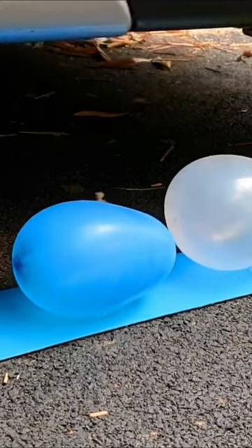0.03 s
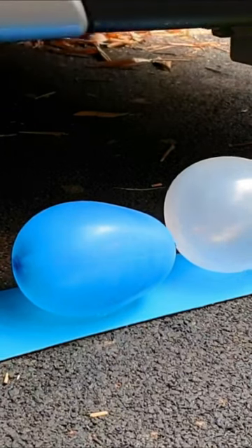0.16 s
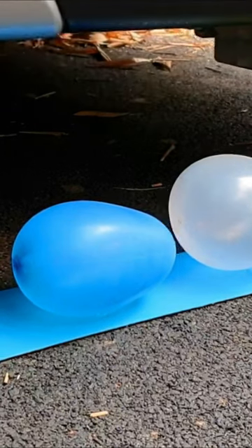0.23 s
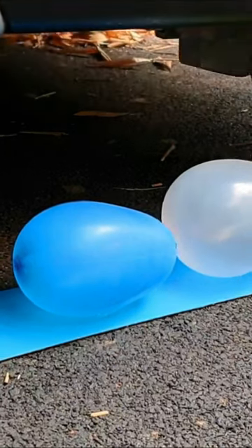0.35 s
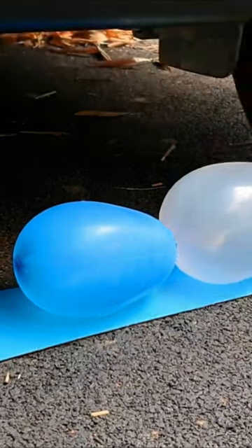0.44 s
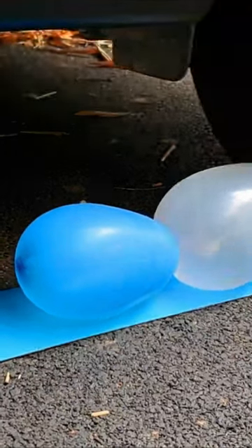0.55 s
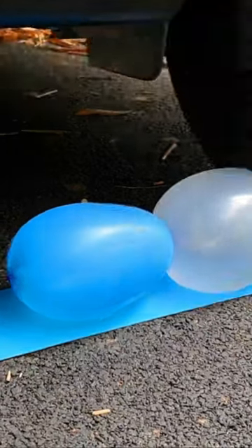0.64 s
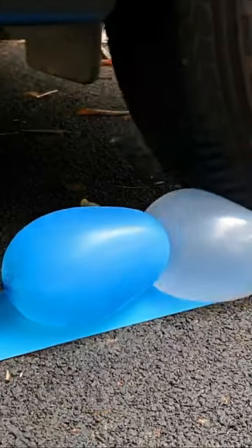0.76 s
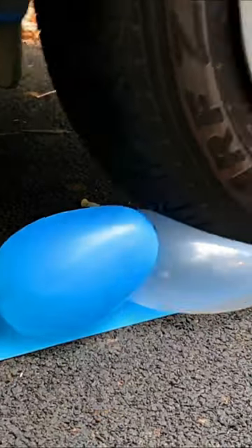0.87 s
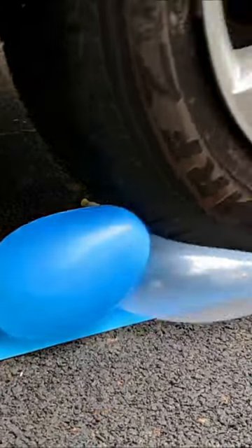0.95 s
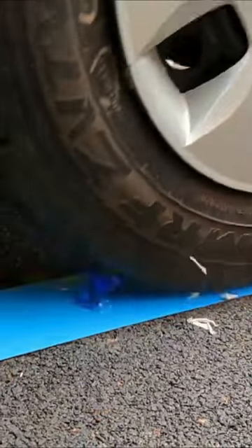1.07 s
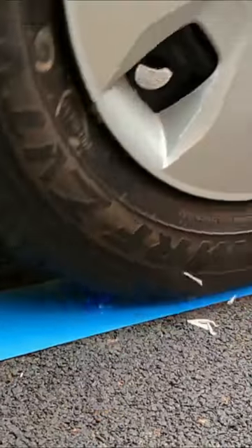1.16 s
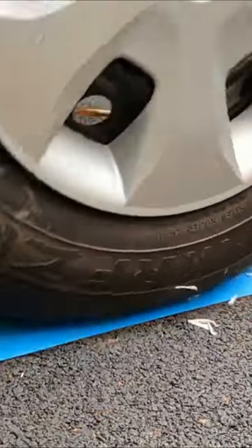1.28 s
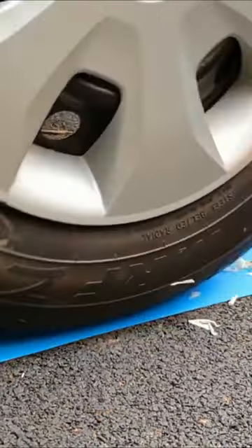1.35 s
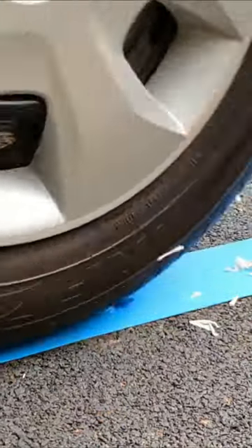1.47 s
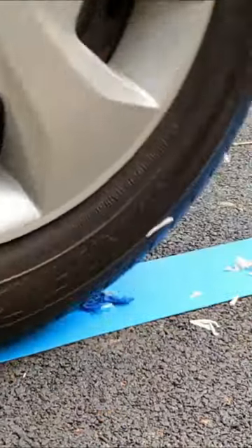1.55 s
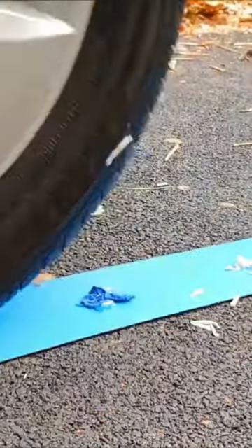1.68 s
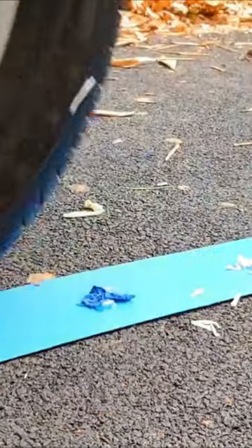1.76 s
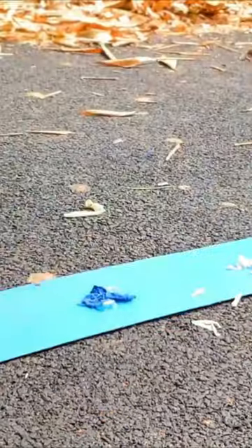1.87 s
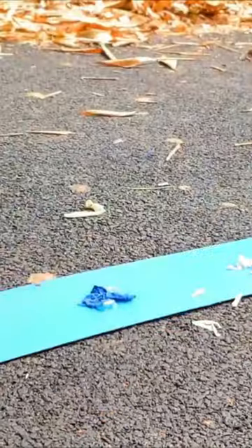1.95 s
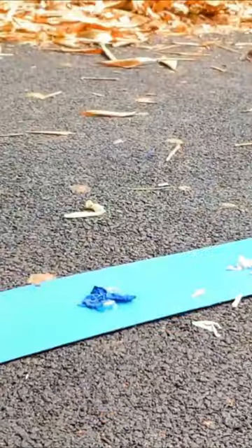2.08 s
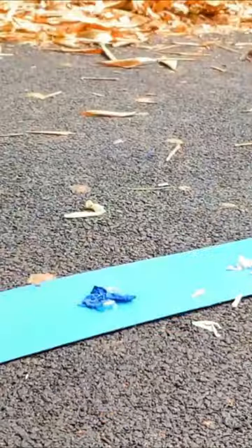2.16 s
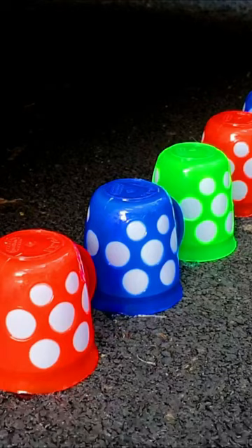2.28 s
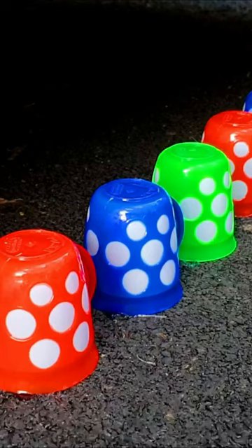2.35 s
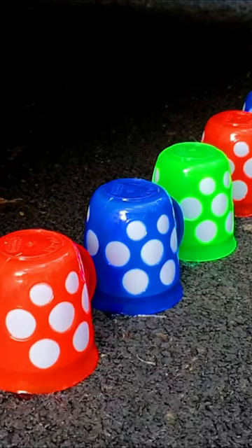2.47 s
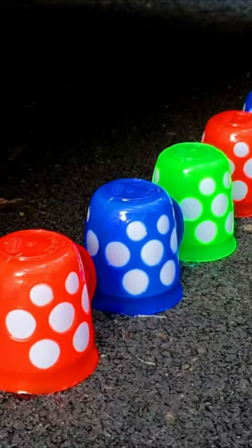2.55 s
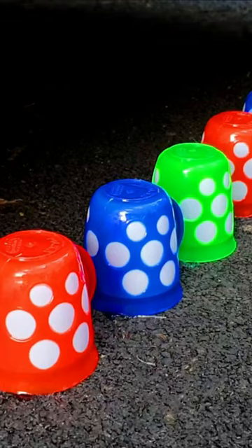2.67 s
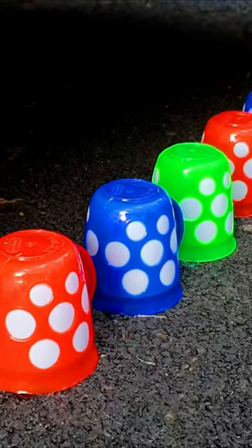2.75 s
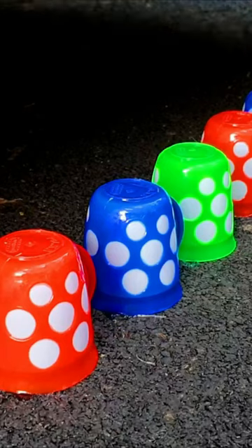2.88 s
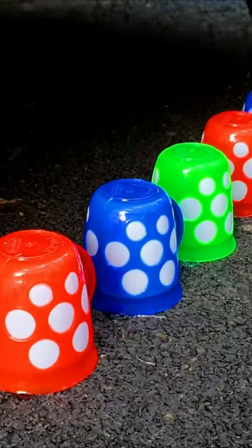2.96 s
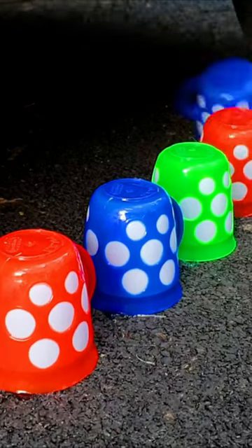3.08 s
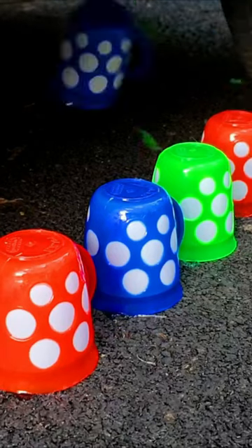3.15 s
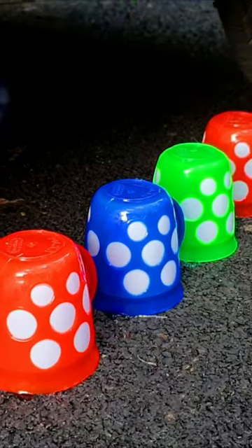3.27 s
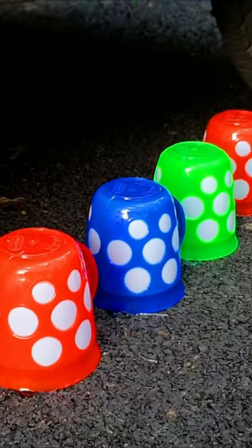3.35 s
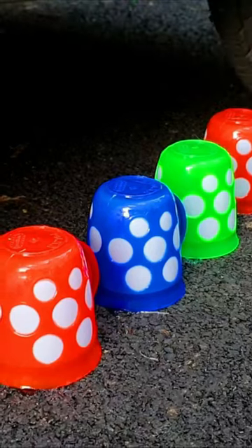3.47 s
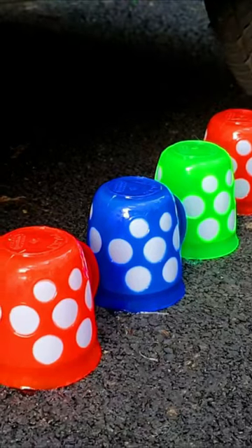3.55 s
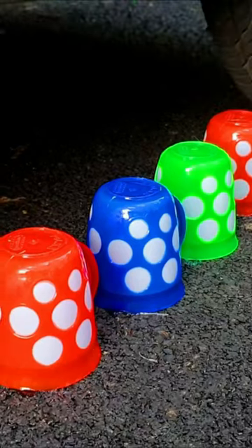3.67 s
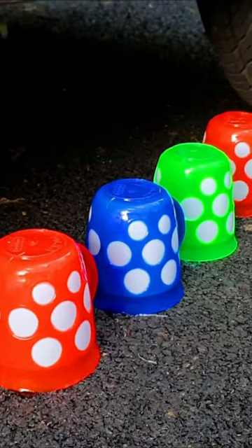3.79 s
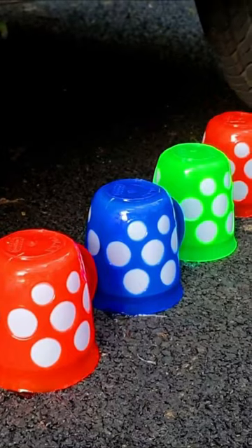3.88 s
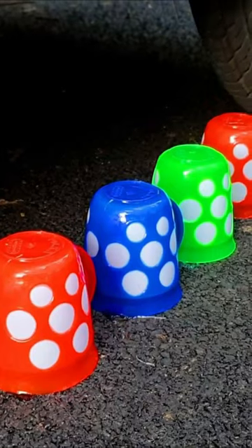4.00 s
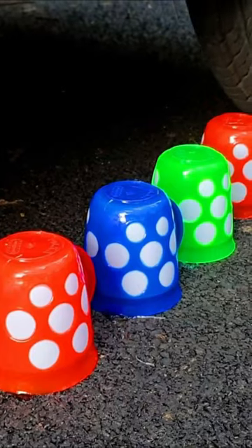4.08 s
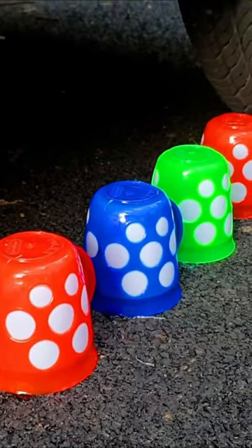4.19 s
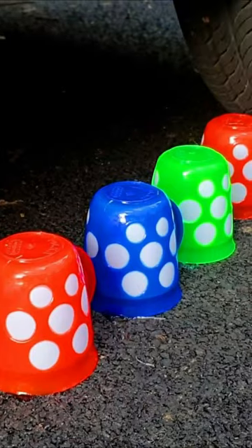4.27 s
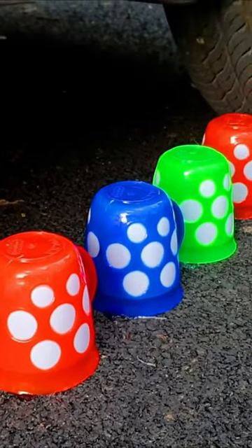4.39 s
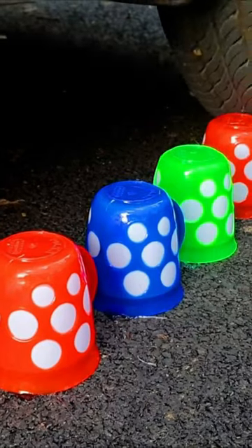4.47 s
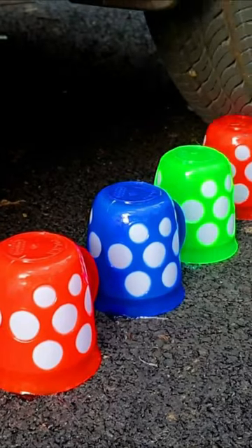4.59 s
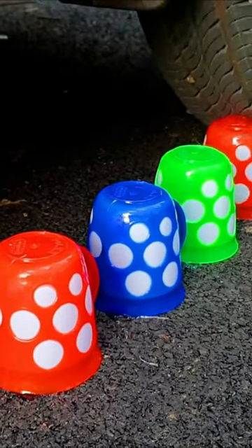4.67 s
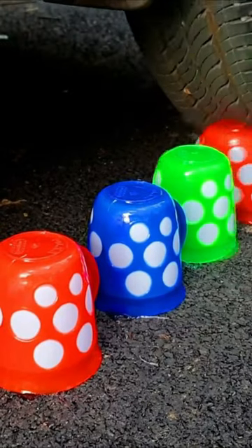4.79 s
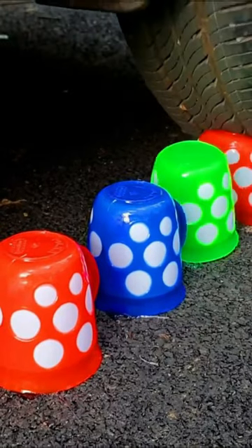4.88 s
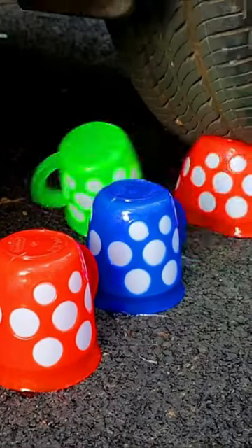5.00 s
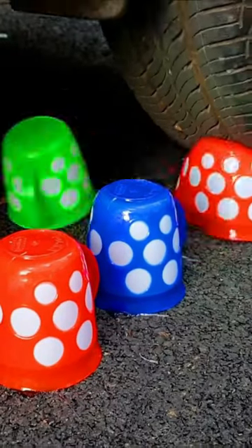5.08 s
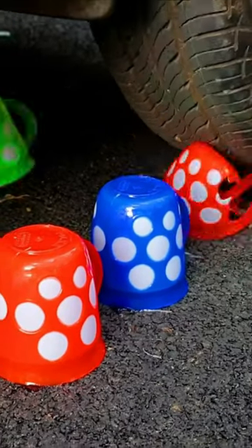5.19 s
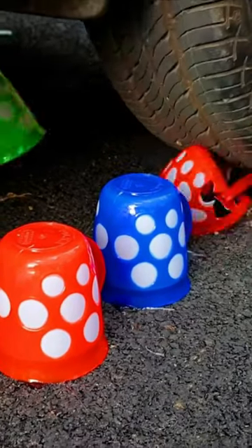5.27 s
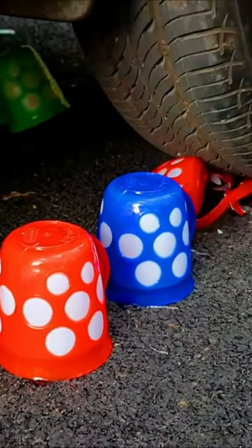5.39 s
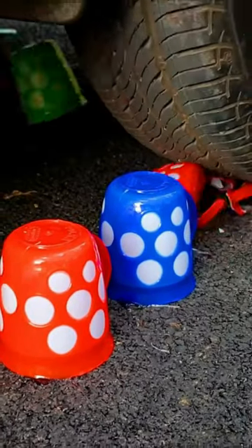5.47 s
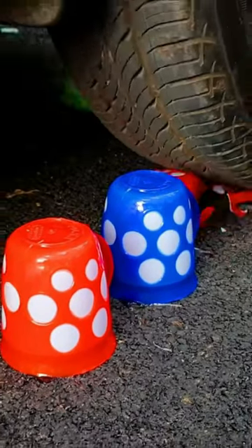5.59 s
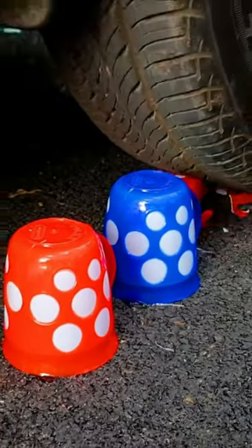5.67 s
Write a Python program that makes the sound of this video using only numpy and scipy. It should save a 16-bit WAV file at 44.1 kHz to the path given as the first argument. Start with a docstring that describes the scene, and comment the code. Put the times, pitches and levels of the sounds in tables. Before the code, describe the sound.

Close to a car tyre on asphalt, the engine is at first barely audible, with a dry tick or two at 0.2-0.3 s and a light rubbery tap near 0.6. A balloon bursts at 0.7 s with a huge blunt bang and a puff of low air; another pops at 1.1 in a tight double crack, a third at 1.6. Each leaves a short, diffuse answer from beneath the car. It goes almost quiet, wholly silent around 2.4, then low engine hum and hiss jump in, with a faint whine falling until 2.85. At 3.15-3.3 hard plastic cracks and crunches; hollow knocks, clacks and gritty ticks scatter until about 4.1 while the engine sinks. It swells again, rising in pitch. At 4.85 a heavier crush begins: dense splintering cracks until 5.3, then sparser snaps, a last sharp one at 5.64. Peaks sound flattened, with a dull copy slightly ahead.

```python
"""A car hums and hisses close by, with a few dry ticks: an engine idles and the car creeps over asphalt.
Its tyre bursts three balloons; after a short silence of the car it crushes hard plastic cups that bounce away.
The car is wavering tones plus shaped noise; blows are bursts of small breaks sent through resonances.
The underbody answers each blow with fading noise, slow thumps swing and crumble, and loud peaks flatten.
Everything sounds doubled: a fainter, duller copy runs just ahead."""
import sys
import numpy as np
from scipy import signal
from scipy.fft import rfft, irfft, next_fast_len
from scipy.io import wavfile
from scipy.ndimage import map_coordinates

SR = 44100
rng = np.random.default_rng(int(sys.argv[2]) if len(sys.argv) > 2 else 0)


def log_audio(samples):
    """Write samples as a 16-bit WAV file to the path given in sys.argv[1]."""
    # one column per channel
    frames = np.atleast_2d(samples).T
    # limit to full scale, then quantise
    limited = np.clip(frames, -1, 1)
    pcm = np.round(limited * 32767).astype(np.int16)
    wavfile.write(sys.argv[1], SR, pcm)


def volts_from_decibels(level):
    """Turn decibel levels (scalar or array-like) into linear amplitude factors."""
    exponent = np.asarray(level, float) / 20
    return 10 ** exponent


N = 253134  # length in samples

# Running car [t/s, rumble level/dB, hiss level/dB]
CAR_LEVELS = [(0, -59.5, -63.5), (.2, -58.5, -66.5), (.36, -59.5, -61.5), (.65, -59, -66), (.92, -68, -76),
              (1.85, -76, -84), (2.37, -73.5, -89), (2.42, -41.5, -52.5), (2.52, -41, -50.5),
              (2.72, -41, -59.5), (2.78, -47.5, -59.5), (3.4, -51.5, -59), (3.8, -65.5, -74.5),
              (4.1, -54.5, -72.5), (4.5, -49, -68.5), (4.75, -48, -68.5), (5.74, -54, -53)]
# How often the engine fires [t/s, firing rate f/Hz]
FIRING_RATE = [(0, 36.5), (.65, 34.5), (.9, 25), (1.8, 22.5), (2.38, 22.5), (2.41, 38.5), (2.72, 28),
               (2.8, 26), (3.95, 23), (4.2, 30.5), (4.5, 39), (4.75, 43.5), (5.74, 46)]
# Tone colour of the exhaust [f/Hz, relative level/dB]
EXHAUST_COLOUR = [(25, -25.5), (68, -3.5), (117, -6), (209, -12.5), (285, -15.5), (368, -27.5),
                  (519, -35.5), (1500, -46.5), (3300, -120)]
# Tone colour of fan and tyre [f/Hz, relative level/dB]
HISS_COLOUR = [(200, -52.5), (400, -8), (1900, -18), (3210, -23), (5270, -16.5), (7400, -32), (10100, -24),
               (16000, -51)]
# Belt whine [t/s, f/Hz, level/dB]
BELT_WHINE = [(2.502, 1942, -63), (2.657, 1600, -63.5), (2.8, 1457, -60.5)]
ROUGH_DB = -8  # exhaust noise under the firing tones
# Below a brisk idle, hiss above FIZZ_HZ fades by this many dB per Hz of lost firing rate
FIZZ_HZ, FIZZ_DB_PER_HZ, BRISK_HZ = 6700, 0.7, 35
FALLS_SILENT_S, FADE_S, RESUMES_S = 2.345, .02, 2.439  # the car's short silence

# Dry ticks of grit and chips [t/s, snap level/dB, snap f/Hz]
GRIT_TICKS = [(.032, -34, 9800), (.23, -23.5, 3724), (3.297, -20.5, 4520), (3.426, -19, 5380),
              (3.605, -20.5, 4440), (3.732, -31.5, 6760), (3.923, -37.5, 4860)]
TICK_SNAP_DB, TICK_HZ = 25.5, 2030  # snap over their faint ring, pitch of that ring
# Plastic breaking or clacking [t/s, ring level/dB, ring f/Hz, snap over ring level/dB, snap f/Hz]
PLASTIC_CRACKS = [(.313, -21, 4610, 2, 9420), (3.157, -4, 715, 3.5, 3396), (3.17, -13, 570, -1.5, 4190),
                  (3.209, -9.5, 710, -10.5, 2497), (3.254, -6.5, 970, 6.5, 5078),
                  (3.273, -8.5, 1690, -1.5, 4560), (3.532, -22, 1300, -0.5, 5170),
                  (3.594, -20, 1770, -4, 3765), (3.767, -32, 1160, 3.5, 3360), (3.899, -10, 1765, 2, 4074),
                  (3.968, -32, 1440, 6, 2850), (4.144, -24, 1400, -9, 3900), (4.848, 0.5, 1110, 1, 4645),
                  (4.923, -8, 600, 5.5, 2654), (4.949, -15.5, 900, 3.5, 4310), (5, -12.5, 1530, 8.5, 3830),
                  (5.018, -8, 1660, 7, 4524), (5.036, -7, 1600, 1, 3190), (5.102, -17.5, 1050, 6.5, 3590),
                  (5.1449, -15.5, 734, 13.5, 3930), (5.164, -14, 1030, 9, 4065),
                  (5.209, -10.5, 1085, 7.5, 3760), (5.233, -18.5, 1030, 2, 3100),
                  (5.262, -24.5, 1010, 9, 3440), (5.289, -24.5, 990, 11, 1896),
                  (5.386, -26.5, 1200, -5, 2980), (5.462, -14, 1290, -12, 3040),
                  (5.519, -14, 1560, 11, 4395), (5.639, -19, 1060, 17.5, 3916)]
# Hollow knocks of a cup bouncing on asphalt, and a short scrape at 3.663 s [t/s, ring level/dB, ring f/Hz]
CUP_KNOCKS = [(3.007, -28.5, 653), (3.316, -27.5, 1700), (3.415, -17, 972), (3.47, -21.5, 915),
              (3.648, -22.5, 1280), (3.663, -30.5, 1640), (3.708, -38.5, 1050), (3.858, -26.5, 1180),
              (4.025, -37.5, 1670), (5.059, -15, 830), (5.321, -31, 1250)]
KNOCK_SNAP_DB, KNOCK_SNAP_RATIO = -19.5, 3.1  # their weak upper ring: level and pitch over the ring
# Balloons, tapped once and then bursting
# [t/s, ring level/dB, ring f/Hz, snap over ring level/dB, snap f/Hz, ring width / ring f]
BALLOON_POPS = [(.581, -37, 898, -8, 2016, .4), (.7185, 3.5, 1114, -3.5, 2816, 0.94),
                (1.0975, -8.5, 2344, -3, 4255, 0.22), (1.11, 1.5, 1073, 5, 542, 0.23),
                (1.6215, 2, 1030, -7, 3862, .3)]
# Where the blows sit [t/s, left minus right level/dB]
BLOW_SIDES = [(.72, 3), (3.15, 2), (4.1, 8), (4.8, 2), (5.7, 0)]
# Bright edge around a blow's own snap [f/Hz, width f/Hz, relative level/dB]
SNAP_EDGE = [(2300, 9000, -20.5), (10300, 3700, -12.5)]
CUP_DAMPING, BROKEN_DAMPING = .1, .2  # ring width / ring f: whole cup, breaking wall
SNAP_DAMPING = 0.18  # snap width / snap f

# Fading of the underbody's answer [f/Hz, time to fall 60 dB t/s before the linger share]
UNDERBODY_FADE = [(100, .08), (500, 0.49), (1000, 0.87), (4000, 0.78), (12000, 0.69)]
# Tone colour of that answer [f/Hz, relative level/dB]
UNDERBODY_COLOUR = [(180, -41.5), (300, -8.5), (725, -13), (3950, -16.5), (7950, -28.5), (10600, -21.5),
                    (16000, -41.5)]

# Aftermath of the big blows
# [t/s, air swing level/dB, crunch level/dB, crumble level/dB, left minus right level/dB]
BIG_THUMPS = [(.719, -4, -18, -11, -5.5), (1.11, -15, -25.5, -10, 6.5), (1.619, -15, -22, -10, 3.5),
              (3.157, -20, -9.5, -7.5, 2.5), (3.254, -20, -8.5, -7.5, 3.5), (4.922, -21, -12, -2.5, 3),
              (5.017, -31, -23, -13.5, 2), (5.145, -27, -32.5, -18.5, -11.5),
              (5.638, -23.5, -35, -25, -8.5)]
# Resonances of a collapsing wall [f/Hz, width f/Hz, relative level/dB]
WALL_MODES = [(600, 190, -4.5), (1030, 190, -4), (1600, 200, -10), (4660, 1500, -21.5)]
DEBRIS_DB, DEBRIS_T60_S = -10, 0.54  # splinters: level over the crumble, decay before a closing fade

LEAD = 768  # samples by which the faint copy runs ahead
# The copy's level for a 0 dB blow, and dB it gains per dB of blow: weak blows double more
EARLY_DB, EARLY_GROWS = -18, 0.86


def unit(x):
    """Scale to rms 1."""
    return x / np.sqrt(np.mean(x ** 2) + 1e-20)


def peak(x):
    """Scale to peak 1."""
    return x / np.max(abs(x))


def along(points, hz):
    """Read a curve of (Hz, value) points on a log frequency axis."""
    f, v = np.transpose(points)
    return np.interp(np.log(hz + 1), np.log(f + 1), v)


def curves(rows):
    """One value per sample for each column after the time."""
    s, *cols = np.transpose(rows)
    return [np.interp(np.arange(N) / SR, s, c) for c in cols]


def wobble(rate):
    """A smooth random curve with rate random points a second."""
    points = rng.standard_normal(int(N * rate / SR) + 4)
    return map_coordinates(points, [np.arange(N) * rate / SR])


def filtered(x, response):
    """Multiply the spectrum of x by a complex response of frequency."""
    n = x.shape[-1]
    m = next_fast_len(n + 8192)
    return irfft(rfft(x, m) * response(np.fft.rfftfreq(m, 1 / SR)), m)[..., :n]


def modes(table):
    """Resonances from rows of (Hz, width in Hz, dB); each can only ring after it is struck."""
    def response(f):
        total = 0
        for k, (centre, width, db) in enumerate(table):
            resonance = 1j * f * width / (centre * centre - f * f + 1j * f * width)
            total = total + (-1) ** k * volts_from_decibels(db) * resonance  # alternating signs
        return total
    return response


def pair(alike, n):
    """Stereo noise whose sides share part of their waves."""
    a, b = rng.standard_normal((2, n))
    turn = np.arccos(np.clip(alike, 0, 1)) / 2
    return np.array([np.cos(turn) * a + np.sin(turn) * b, np.cos(turn) * a - np.sin(turn) * b])


def dull(x):
    """Soften the treble, as in the faint copy."""
    return filtered(x, lambda f: 1 / (1 + 1j * f / 7000))


def doubled(x, early_db):
    """Add the faint, duller copy that runs ahead."""
    early = np.pad(x[:, LEAD:], ((0, 0), (0, LEAD)))
    return x + volts_from_decibels(early_db) * dull(early)


def engine_rumble(firing_hz, rumble_db):
    """Wavering multiples of the firing rate over rough exhaust noise."""
    turns = np.cumsum(firing_hz * (1 + 0.006 * wobble(8)) / SR)  # uneven firings
    tones = 0
    for k in range(1, 12):  # higher multiples lose level and waver more
        level_db = along(EXHAUST_COLOUR, k * firing_hz) - k / 2 + 2 * wobble(6)
        phase = 2 * np.pi * (k * turns + rng.random()) + .03 * k * wobble(25)
        tones = tones + volts_from_decibels(level_db) * np.sin(phase)
    rough = pair(0.72, N) * volts_from_decibels(3.9 * wobble(36))
    rough = unit(filtered(rough, lambda hz: volts_from_decibels(along(EXHAUST_COLOUR, hz))))
    return volts_from_decibels(rumble_db) * (unit(tones) + volts_from_decibels(ROUGH_DB) * rough)


def fan_and_tyre_hiss(firing_hz, hiss_db):
    """Flickering shaped noise whose top fades when the engine fires slowly."""
    hiss = unit(filtered(pair(0.11, N), lambda hz: volts_from_decibels(along(HISS_COLOUR, hz))))
    fizz = filtered(hiss, lambda hz: hz > FIZZ_HZ)
    fizz_db = FIZZ_DB_PER_HZ * np.minimum(firing_hz - BRISK_HZ, 0)
    hiss = hiss - fizz * (1 - volts_from_decibels(fizz_db))
    return hiss * volts_from_decibels(hiss_db + 2.1 * wobble(14.0) + 2.3 * wobble(160))


def belt_whine():
    """One unsteady sine that winds down in pitch."""
    first, last = BELT_WHINE[0], BELT_WHINE[-1]
    fade_in = [(first[0] - .03, first[1], -120)]
    fade_out = [(last[0] + 0.071, last[1], -120)]
    whine_hz, whine_db = curves(fade_in + list(BELT_WHINE) + fade_out)
    phase = 2 * np.pi * np.cumsum(whine_hz * (1 + .018 * wobble(120))) / SR
    return volts_from_decibels(whine_db + 2.5 * wobble(57)) * np.sin(phase)


def car():
    """Rumble, hiss and whine sound together and fall silent together for a moment."""
    firing_hz, = curves(FIRING_RATE)
    rumble_db, hiss_db = curves(CAR_LEVELS)
    running = engine_rumble(firing_hz, rumble_db) + fan_and_tyre_hiss(firing_hz, hiss_db) + belt_whine()
    silence_db, = curves([(FALLS_SILENT_S, 0), (FALLS_SILENT_S + FADE_S, -70),
                          (RESUMES_S, -70), (RESUMES_S + .003, 0)])
    return running * volts_from_decibels(silence_db)


def shower(alike, sharpness, t60):
    """A dying run of small breaks: few large, many small."""
    t = np.arange(SR // 6) / SR
    breaks = pair(alike, len(t)) * np.exp(sharpness * rng.standard_normal(len(t)))
    return volts_from_decibels(-60 * t / t60) * unit(breaks)


def struck_piece(breaks, hz, treble_db, snap_hz, damping, side_db):
    """The breaks make a piece ring and snap brightly; the louder side also hears it first."""
    ring = filtered(breaks, modes([(hz, damping * hz, 0)]))
    # a soft contact has little treble, a small piece little bass
    ring = filtered(ring, lambda f: (1 + 1j * f / (1.9 * hz)) ** -2 * 1j * f / (hz * 0.53 + 1j * f))
    snap_modes = modes([SNAP_EDGE[0], (snap_hz, SNAP_DAMPING * snap_hz, 0), SNAP_EDGE[1]])
    # pieces flung off to the left sound duller
    far = lambda f: (1 + 1j * f * volts_from_decibels(side_db) / 12000) ** -2
    snap = filtered(breaks, lambda f: snap_modes(f) * far(f))
    dry = peak(ring) + volts_from_decibels(treble_db) * peak(snap)
    left_right = np.array([[-1], [1]])
    lag = left_right * side_db * .000008  # seconds
    return filtered(dry, lambda f: volts_from_decibels(-side_db / 2 * left_right) * np.exp(-2j * np.pi * f * lag))


def underbody(x, length, linger):
    """A fresh diffuse answer from between car and asphalt; each frequency dies at its own speed."""
    hz, t, z = signal.stft(rng.standard_normal((2, length)), SR, nperseg=256)
    colour_db = along(UNDERBODY_COLOUR, hz)[:, None]
    fade_db = 60 * t / linger / along(UNDERBODY_FADE, hz)[:, None]
    tail = signal.istft(z * volts_from_decibels(colour_db - fade_db), SR, nperseg=256)[1]
    tail = tail / np.linalg.norm(tail[0])
    return signal.fftconvolve(x[None], tail, axes=1)[:, :length]


def blows(table, after_db, after_t60, own_db, bang_db, linger):
    """A first break and a shower of smaller ones strike each piece; the underbody answers it.

    own_db sets how strongly the piece's own sound feeds the answer, bang_db a single sharp click."""
    out, length = np.zeros((2, N + SR)), SR // 3
    for s, db, hz, treble_db, snap_hz, damping in table:
        breaks = volts_from_decibels(after_db) * shower(0.077, 1.107, after_t60)
        breaks[:, 0] = 1
        side_db = np.interp(s, *np.transpose(BLOW_SIDES))
        dry = struck_piece(breaks, hz, treble_db, snap_hz, damping, side_db)
        bang = np.arange(dry.shape[1]) == 0
        blow = np.pad(dry, ((0, 0), (0, length + 60 - dry.shape[1])))
        # the answer starts 60 samples late
        blow[:, 60:] += underbody(volts_from_decibels(own_db) * dry[0] + volts_from_decibels(bang_db) * bang, length, linger)
        at = round(s * SR)
        out[:, at:at + blow.shape[1]] += volts_from_decibels(db) * blow
        early = at - LEAD
        out[:, early:early + blow.shape[1]] += volts_from_decibels(EARLY_DB + EARLY_GROWS * db) * dull(blow)
    return out[:, :N]


def cups_and_grit():
    """Grit ticks, breaking plastic rings broadly, and bouncing cups ring more narrowly."""
    ticks = [(s, db - TICK_SNAP_DB, TICK_HZ, TICK_SNAP_DB, hz) for s, db, hz in GRIT_TICKS]
    knocks = [(s, db, hz, KNOCK_SNAP_DB, KNOCK_SNAP_RATIO * hz) for s, db, hz in CUP_KNOCKS]
    pieces = [(*row, BROKEN_DAMPING) for row in PLASTIC_CRACKS]
    pieces += [(*row, CUP_DAMPING) for row in knocks + ticks]
    return blows(pieces, after_db=-18, after_t60=0.036, own_db=-30.5, bang_db=-24.0, linger=.75)


def balloons():
    """A tap and bursts, answered by the underbody mainly as sharp bangs."""
    return blows(BALLOON_POPS, after_db=-25.0, after_t60=0.031, own_db=-44, bang_db=-0.5, linger=0.45)


def thumps():
    """Squeezed air swings slowly while walls crunch low and crumble; cups leave splinters."""
    out, t = np.zeros((2, N + SR)), np.arange(SR // 6) / SR
    swing = -np.sin(2 * np.pi * 58 * t) * t / 0.0099 * np.exp(1 - t / 0.0078)
    crunch_modes = modes([(111.5, 13, 2.5), (170, 44, 1.0), (358, 380, -10.5)])
    for s, swing_db, crunch_db, crumble_db, side_db in BIG_THUMPS:
        crunch = filtered(shower(0.98, 0.76, t60=0.17), crunch_modes)
        crumble = filtered(shower(0.84, 0.35, t60=0.14), modes(WALL_MODES))
        layers = volts_from_decibels(swing_db) * swing + volts_from_decibels(crunch_db) * peak(crunch) + volts_from_decibels(crumble_db) * peak(crumble)
        if s > RESUMES_S:  # the cups come after the silence
            debris = filtered(shower(0.45, 1.8, DEBRIS_T60_S), modes([(4500, 3000, 0), SNAP_EDGE[1]]))
            closing_fade = np.cos(np.pi / 2 * t / t[-1])
            layers = layers + volts_from_decibels(crumble_db + DEBRIS_DB) * peak(debris) * closing_fade
        at = round(s * SR)
        out[:, at:at + len(t)] += volts_from_decibels(side_db / 2 * np.array([[1], [-1]])) * layers
    return out[:, :N]


def scene():
    """Add all sources; the car is doubled more strongly than the thumps."""
    running = doubled(car(), early_db=-1.0)
    return running + cups_and_grit() + balloons() + doubled(thumps(), EARLY_DB)


def low_pass(x):
    """Removes everything above the highest recorded frequency."""
    return signal.sosfilt(signal.butter(12, 16520, fs=SR, output="sos"), x)


def record(dry):
    """The microphone softens the top treble, and loud peaks flatten towards full scale."""
    heard = filtered(dry, lambda hz: (1 + 1j * hz / 15000) ** -2)
    clipped = heard / (1 + abs(heard) ** 8) ** (1 / 8)
    return low_pass(clipped)


dry = scene()
out = record(dry)
log_audio(out)
```